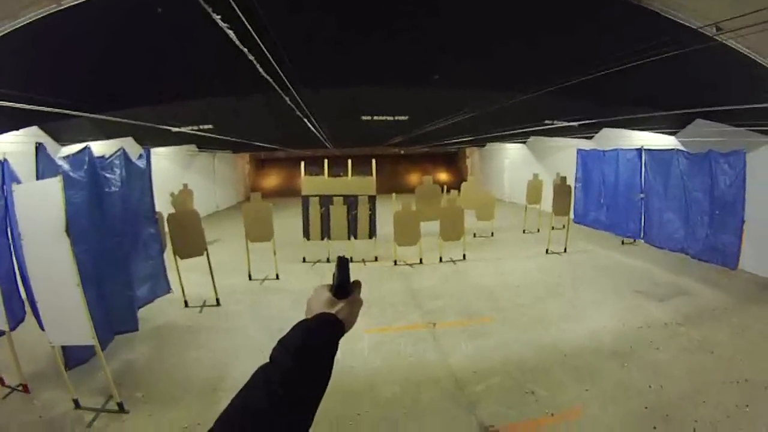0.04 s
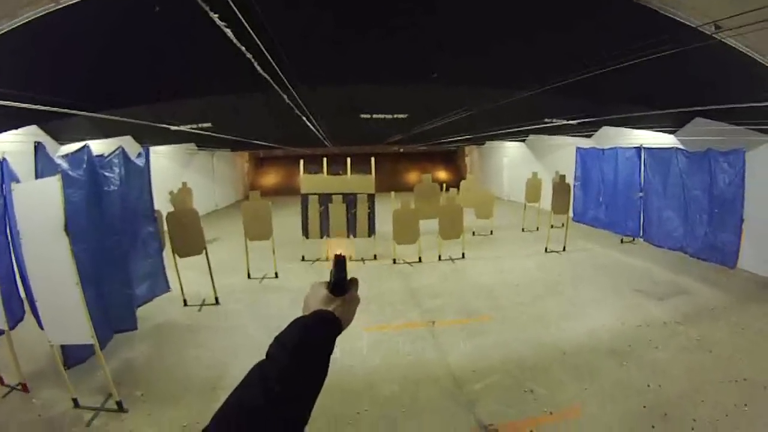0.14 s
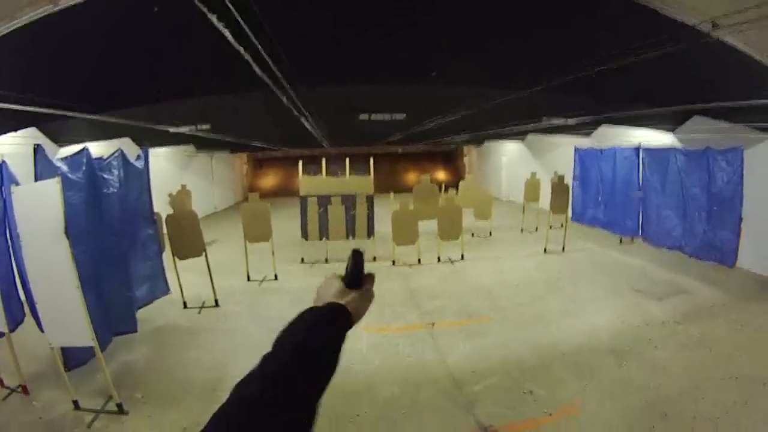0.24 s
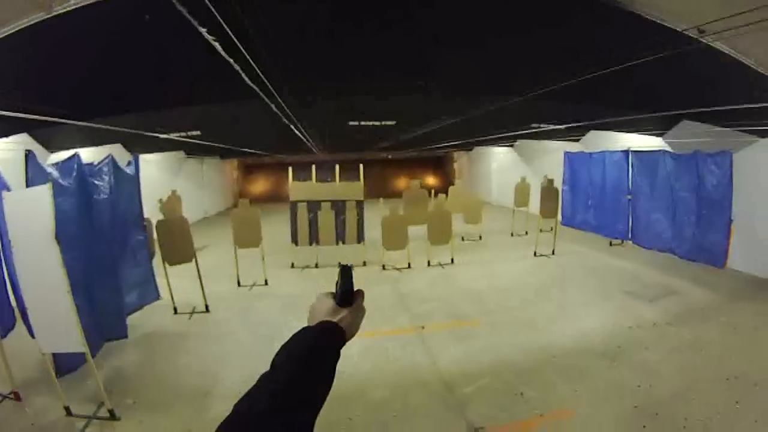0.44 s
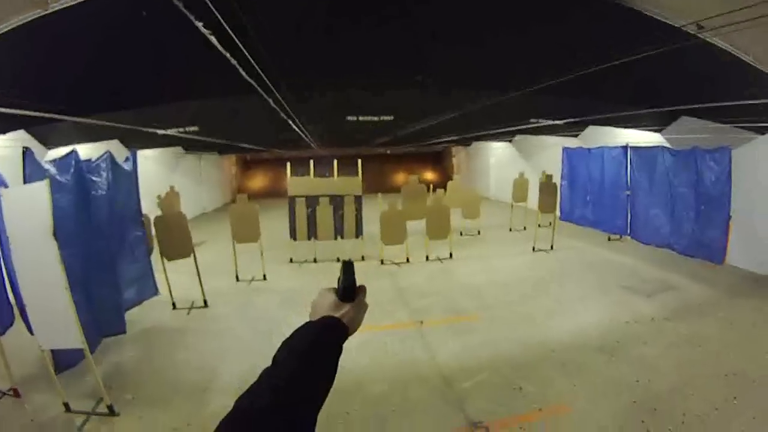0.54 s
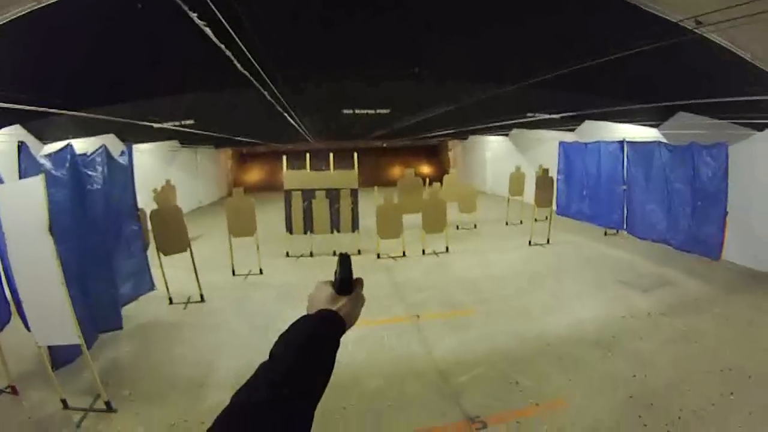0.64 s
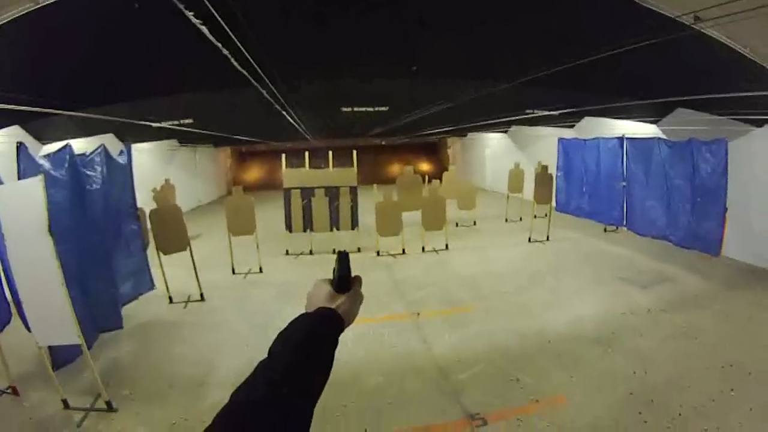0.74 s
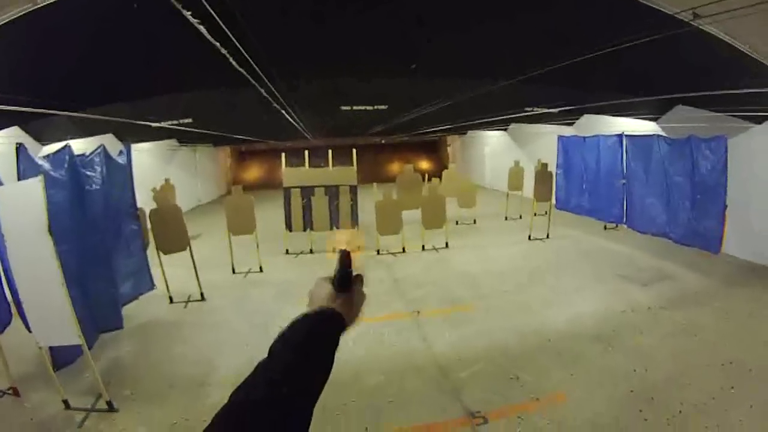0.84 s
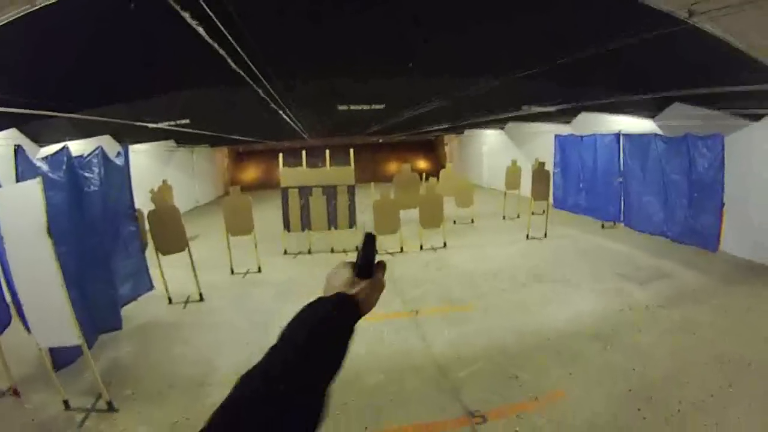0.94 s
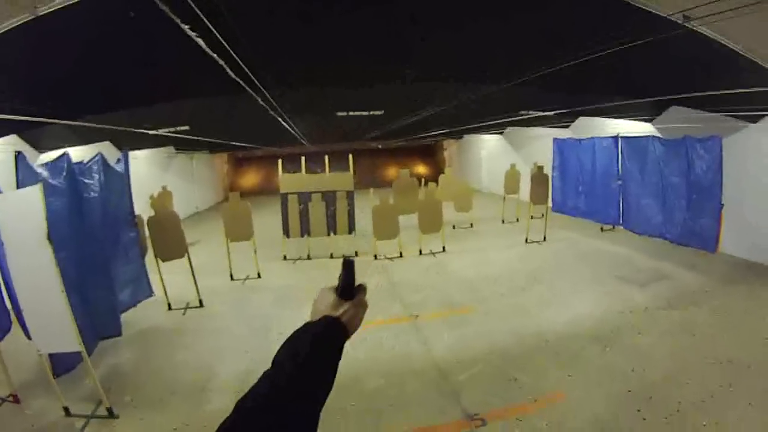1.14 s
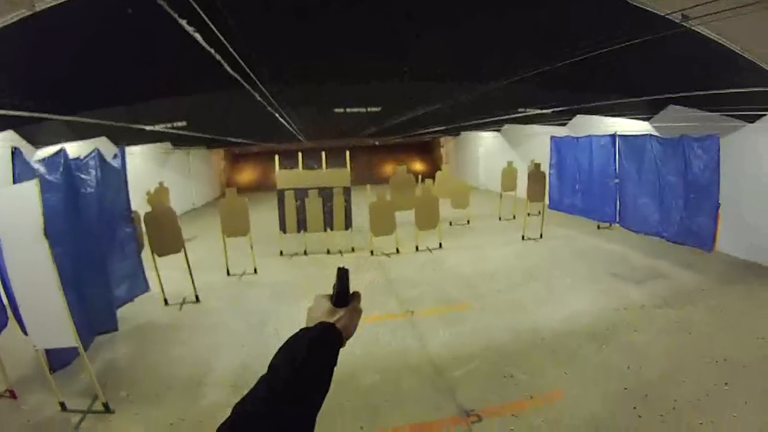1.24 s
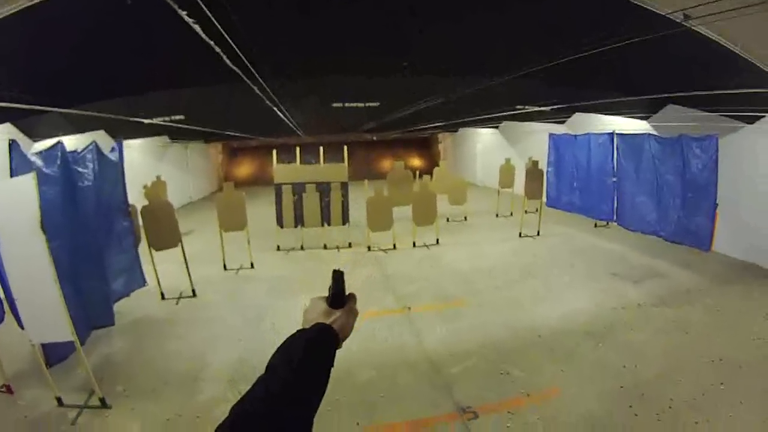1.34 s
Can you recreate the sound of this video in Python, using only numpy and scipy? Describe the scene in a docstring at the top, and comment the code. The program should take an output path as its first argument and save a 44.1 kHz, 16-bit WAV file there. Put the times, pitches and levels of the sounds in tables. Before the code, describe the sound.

The fading echo of an earlier pistol shot opens, then two near-identical close gunshots crack about 0.7 seconds apart, each with hard slapback and a long ring in a concrete indoor range, peaks flattened by the microphone.

```python
"""Concrete indoor range: pistol shots close to the microphone, the first fired before the start.
Each report is a striker tick, a pressure pulse with slaps off near surfaces, and a burst of gas noise.
A volley of reflections and the hall's long ring follow, much the same for every shot.
Ventilation is steady filtered noise. The microphone flattens loud peaks and cuts the top of the band."""
import sys
import numpy as np
from scipy import signal
from scipy.fft import rfft, irfft, next_fast_len
from scipy.io import wavfile

SR = 44100
rng = np.random.default_rng(int(sys.argv[2]) if len(sys.argv) > 2 else 0)


def output_pcm(signal):
    """Save a mono or channel-first signal as 16-bit PCM at the path in sys.argv[1].

    Samples are clipped to [-1, 1] before scaling.
    """
    pcm = np.clip(np.atleast_2d(signal).T, -1, 1) * 32767
    wavfile.write(sys.argv[1], SR, np.round(pcm).astype(np.int16))


N = 61739

# Filter of the muzzle gas and striker. Each row: frequency in Hz, gain in dB.
CRACK_COLOUR = [(200, -34.5), (800, -26.5), (1800, 8.5), (3000, -6), (4000, -17), (7000, -12.5),
                (15000, -28.5)]
# Standing waves of the hall. Each row: frequency in Hz, relative level in dB.
HALL_MODES = [(414.5, -43), (554.5, -39.5), (689.1, -27), (786.0, -27.5), (952.8, -30.5), (1233, -45),
              (1297, -40), (1453, -48), (1507, -34.5)]
STRIKER_LEAD_S = 0.0015


def amp(db):
    """Decibels to gain."""
    return 10 ** (np.asarray(db) / 20)


def along(points, hz):
    """Interpolate (Hz, value) points on a log-frequency axis."""
    f, v = np.transpose(points)
    return np.interp(np.log(hz + 1), np.log(f + 1), v)


def coloured(x, colour):
    """Filter x by (Hz, dB) points; folding the cepstrum makes the filter minimum-phase."""
    size = 2 * len(x)
    gain_db = along(colour, np.fft.rfftfreq(size, 1 / SR))
    cepstrum = irfft(np.log(amp(gain_db)), size)
    cepstrum[1:size // 2] *= 2
    cepstrum[size // 2 + 1:] = 0
    response = np.exp(rfft(cepstrum))
    return irfft(rfft(x, size) * response, size)[:len(x)]


def add(track, s, sound):
    """Mix a sound in at s seconds, which may lie before the start."""
    start = round(s * SR)
    first = max(start, 0)
    part = sound[max(-start, 0):][:max(len(track) - first, 0)]
    track[first:][:len(part)] += part


def blast(t):
    """Muzzle pressure pulse, a push then a suction, with its first slaps off the nearest surfaces."""
    # Each row: delay in seconds, level against the blast in dB.
    slaps = [(.0035, 1.5), (.0052, -3.5), (.0080, 2), (.0120, -5), (0.0149, 1.5), (0.021, -3.5)]
    # Pulse filter at the microphone. Each row: frequency in Hz, gain in dB.
    pulse_colour = [(30, -42), (150, -31), (300, -8), (520, -2.5), (680, 3.5), (800, -2.5), (1350, -3),
                    (1800, -13), (3100, -14.5), (4000, -3), (4700, -13.5), (8000, -20), (15000, -30)]
    gain_db, push_s = 11.5, 0.00026
    push = (1 - t / push_s) * np.exp(-t / push_s)
    pulse = amp(gain_db) * coloured(push, pulse_colour)
    out = pulse.copy()
    for delay_s, db in slaps:
        add(out, delay_s, amp(db) * pulse)
    return out


def crack(t):
    """Turbulent muzzle gas: filtered noise with a short exponential decay."""
    start_db, t60_s = -4.5, 0.025
    gas = coloured(rng.standard_normal(len(t)), CRACK_COLOUR)
    return gas / gas.std() * amp(start_db - 60 * t / t60_s)


def striker(t):
    """Striker tick inside the pistol: decaying filtered noise from just ahead of the blast."""
    gain_db = -25
    tick = coloured(rng.standard_normal(len(t)), CRACK_COLOUR)
    return tick * amp(gain_db) * np.exp(-t / STRIKER_LEAD_S)  # lead is also the decay constant


def volley(t, paths):
    """Reflections off ceiling, side walls and stands: sparse impulses swell, hold, then fade."""
    # Each row: frequency in Hz, relative level in dB.
    patter_colour = [(60, -46), (150, -25.5), (290, -8), (520, -0.5), (675, 4.5), (800, -3.5), (920, -1.5),
                     (1100, -4.5), (1350, 1), (1850, -13.5), (2200, -9), (3200, -23), (4000, -13.5),
                     (4800, -30.5), (5500, -27), (7500, -38.5), (11000, -43), (15000, -53.5)]
    level_db = -10
    rise_s, hold_end_s, t60_s = .028, .066, .2
    patter = coloured(paths, patter_colour)
    rise = np.minimum(t / rise_s, 1)
    fall = amp(-60 * np.maximum(t - hold_end_s, 0) / t60_s)
    return amp(level_db) * rise * fall * patter / patter.std()


def hall(t, walls, phases):
    """Dense echoes and standing waves build up, then decay at a frequency-dependent rate."""
    # Ring spectrum at onset. Each row: frequency in Hz, relative level in dB per Hz.
    ring_colour = [(25, -62.5), (80, -51.5), (110, -36.5), (170, -25.5), (280, -9.5), (480, 0), (700, 2),
                   (1000, 1.5), (1450, -3.5), (2000, -8.5), (2550, -13), (2850, -23), (3250, -24.5),
                   (3600, -13.5), (4150, -12.5), (4650, -28.5), (5600, -26), (7200, -37), (9200, -32),
                   (11000, -51), (15000, -49)]
    # Each row: frequency in Hz, decay time t60 in seconds.
    ring_t60 = [(80, 1.6), (280, 1.32), (600, 1.043), (1100, 1.032), (2200, 0.89), (4000, 0.65),
                (6000, 0.48), (9000, 0.38), (14000, 0.38)]
    wash_db, waves_db = -8.5, 9.5
    late_db, late_stretch = -9.5, 1.502  # far end of the range: weaker, longer ring
    build_s, start_share = .035, .3  # share is of amplitude
    same = 0.72  # power share of the echo noise that repeats from shot to shot

    fresh = rng.standard_normal(len(t))
    echoes = coloured(np.sqrt(same) * walls + np.sqrt(1 - same) * fresh, ring_colour)
    hz, age_s, z = signal.stft(echoes / echoes.std(), SR, nperseg=512)
    fall_db = -60 * age_s / along(ring_t60, hz)[:, None]
    decay = np.hypot(amp(fall_db), amp(late_db + fall_db / late_stretch))
    wash = signal.istft(z * decay, SR, nperseg=512)[1][:len(t)]

    waves = np.zeros(len(t))
    for (f, db), phase in zip(HALL_MODES, phases):  # phase in cycles
        level = amp(db - 60 * t / along(ring_t60, f))
        waves += level * np.sin(2 * np.pi * (f * t + phase))

    build = 1 - (1 - start_share) * np.exp(-(t / build_s) ** 2)
    return build * (amp(wash_db) * wash + amp(waves_db) * waves)


def ventilation():
    """Steady air of the range: filtered noise at a fixed level."""
    # Each row: frequency in Hz, relative level in dB per Hz.
    air_colour = [(30, -36.5), (85, -33.5), (140, -5), (250, -7), (380, 9), (600, -6.5), (1500, -23),
                  (5000, -43), (14000, -51.5)]
    level_db = -61.5
    air = coloured(rng.standard_normal(N), air_colour)
    return amp(level_db) * air / air.std()


def scene():
    """Shots from one spot share blast, reflection paths and modes; gas and part of the ring vary."""
    # Each row: start in seconds, level in dB.
    shots = [(-0.76, 1.5), (.1992, -1.5), (.8888, -1.5)]
    reflections_per_s = 1800
    t = np.arange(next_fast_len(N + SR // 2)) / SR
    walls = rng.standard_normal(len(t))
    phases = rng.random(len(HALL_MODES))
    hits = rng.random(len(t)) < reflections_per_s / SR
    paths = hits * rng.choice([-1, 1], len(t))
    report = blast(t) + volley(t, paths)
    out = ventilation()
    for s, db in shots:
        add(out, s - STRIKER_LEAD_S, striker(t))
        add(out, s, amp(db) * (report + crack(t) + hall(t, walls, phases)))
    return out[None]


def record(dry):
    """Microphone: smooth saturation of peaks, then a steep low-pass."""
    ceiling, hardness, top_hz = .71, 9, 15100
    clipped = dry / (1 + np.abs(dry / ceiling) ** hardness) ** (1 / hardness)
    low_pass = signal.ellip(10, .1, 90, top_hz, fs=SR, output="sos")  # ripple, stopband in dB
    return signal.sosfilt(low_pass, clipped)


dry = scene()
out = record(dry)
output_pcm(out)
```